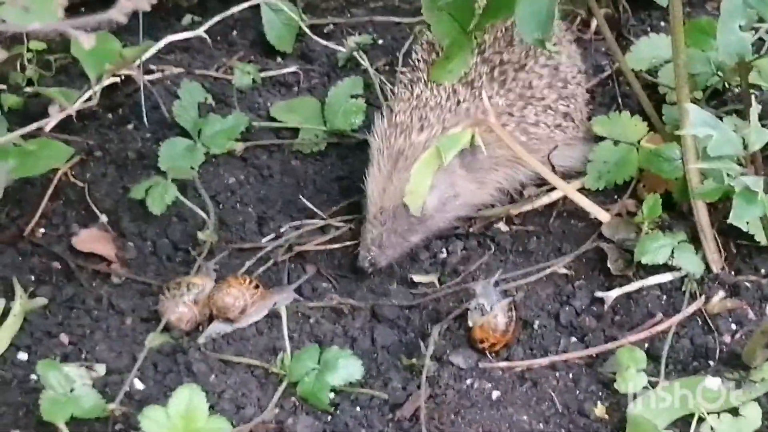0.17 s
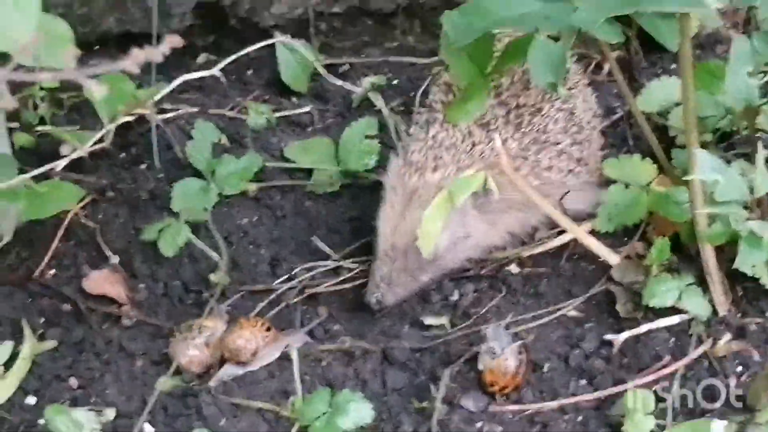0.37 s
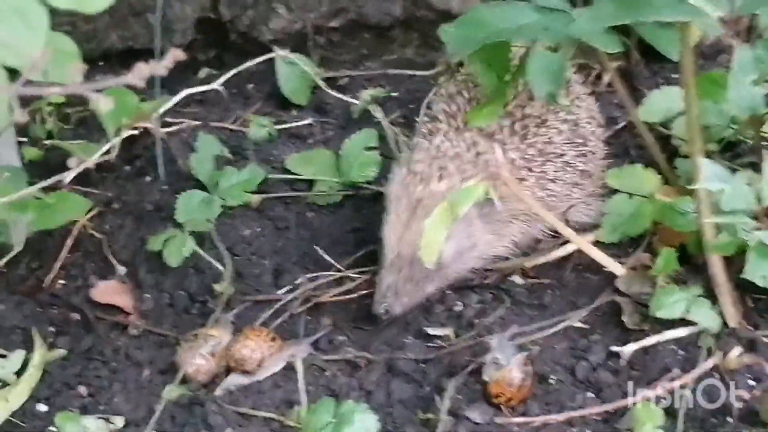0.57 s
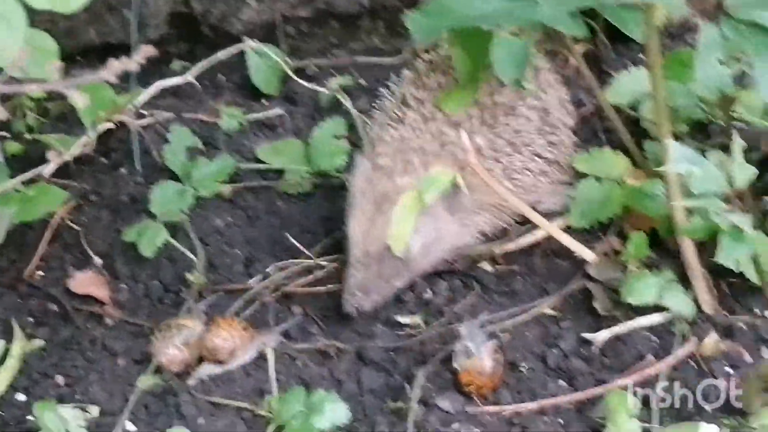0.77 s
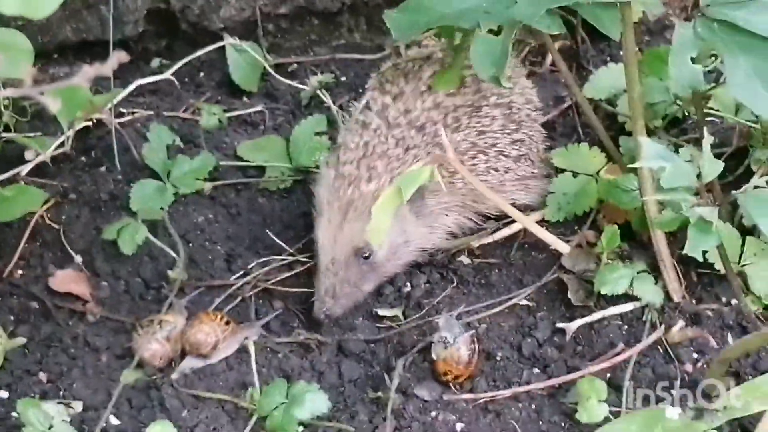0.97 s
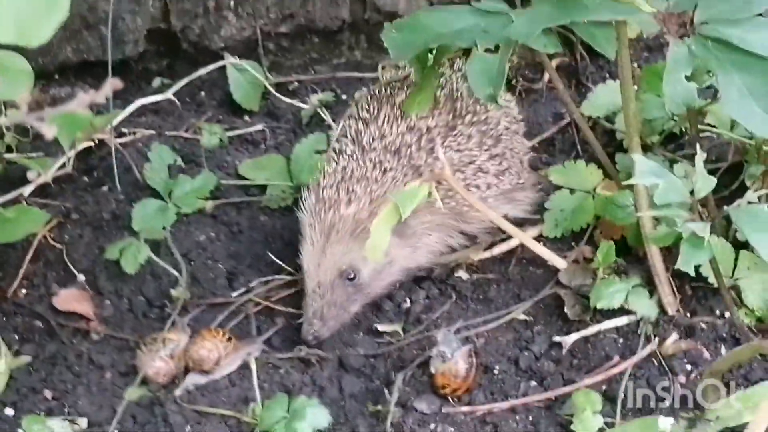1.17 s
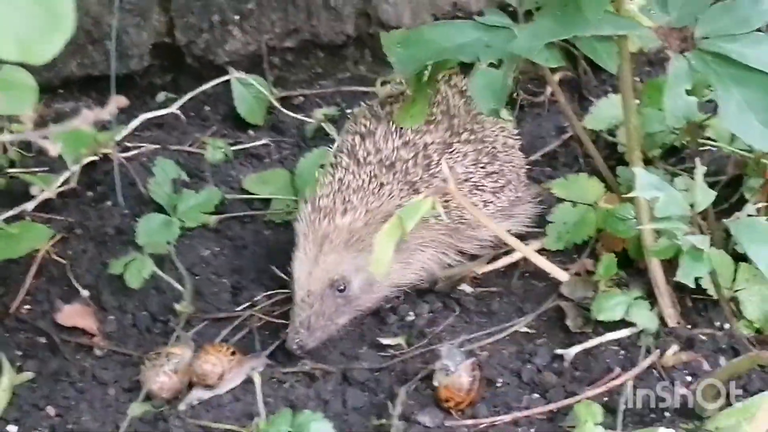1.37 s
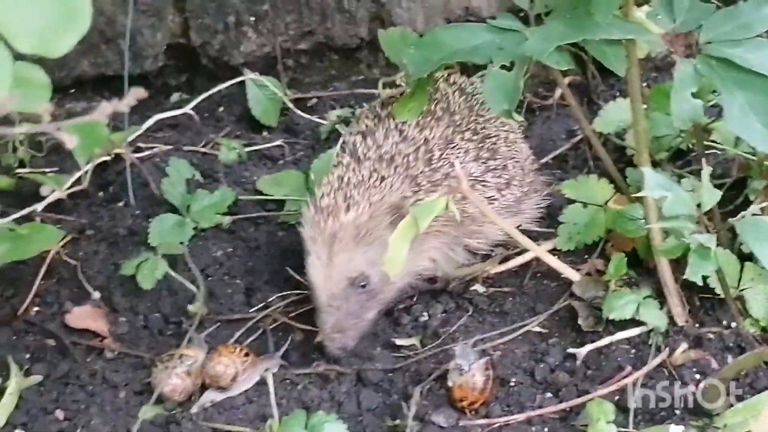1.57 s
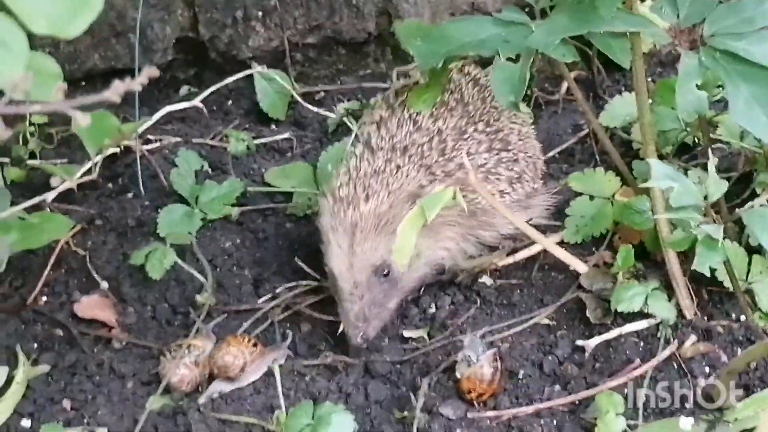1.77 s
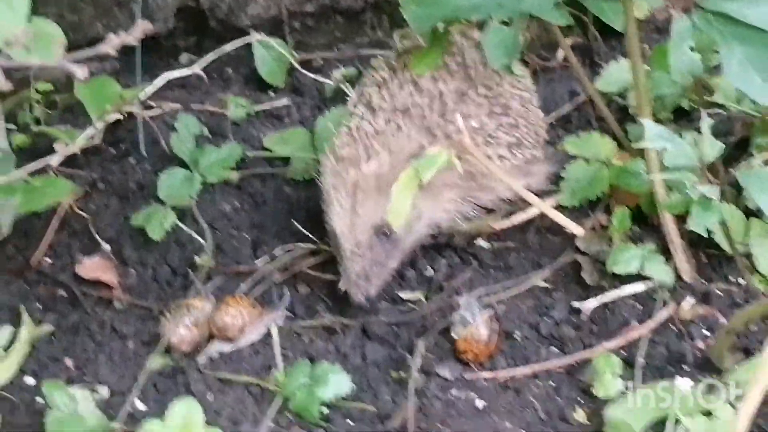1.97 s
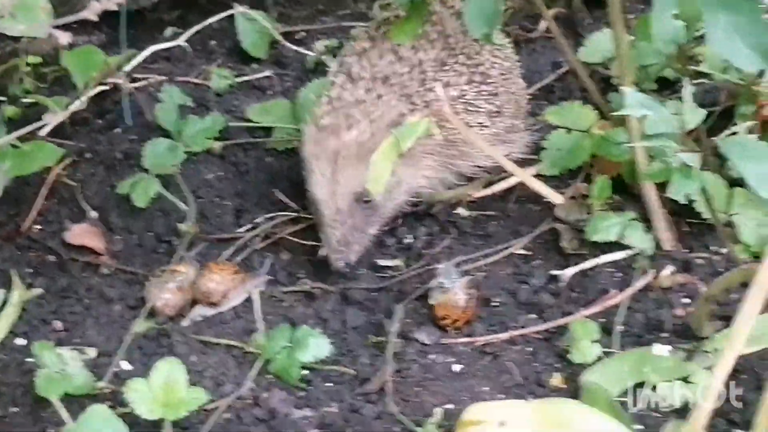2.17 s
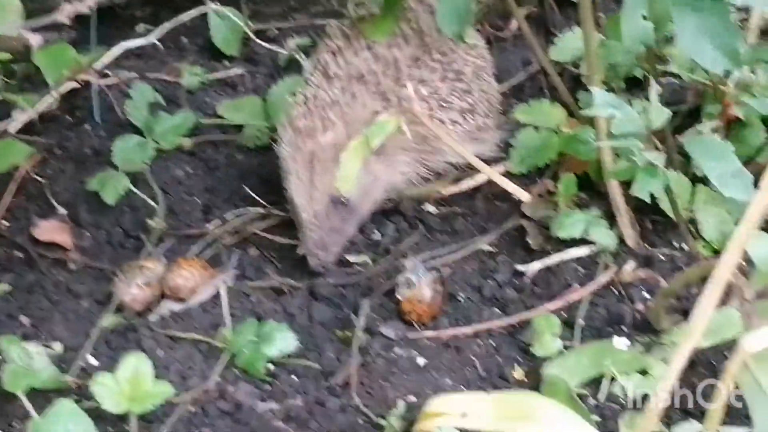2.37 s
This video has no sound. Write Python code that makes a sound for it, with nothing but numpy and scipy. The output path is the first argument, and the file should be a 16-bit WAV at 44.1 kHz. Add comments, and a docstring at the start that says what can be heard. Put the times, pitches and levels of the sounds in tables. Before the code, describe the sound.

Wind buffets the right microphone in rough thumping puffs, with faint garden ticks and leaf rustle.

```python
"""A quiet garden bed where a hedgehog noses through the soil, with garden air throughout as shaped noise.
For the first second and a half, puffs buffet the right microphone port as pressure spikes, with
fluttering bursts of turbulence over low rumble; slower, softer gusts then carry on to the end.
Small ticks and dull taps, short resonant rings, fall on both sides all along.
The sheltered left port has no wind; leaves rustle there as high noise, most clearly after two seconds."""
import sys
import numpy as np
from scipy import signal
from scipy.fft import rfft, irfft
from scipy.io import wavfile
from scipy.ndimage import uniform_filter1d

SR = 44100
rng = np.random.default_rng(int(sys.argv[2]) if len(sys.argv) > 2 else 0)


def digitize_waveform(pressure):
    """Quantize a signal to 16-bit integers and store it at the path in sys.argv[1].

    Rows of a 2-D input are taken as channels; values are limited to [-1, 1].
    """
    field = np.atleast_2d(pressure).T
    bounded = np.clip(field, -1, 1)
    quanta = np.round(bounded * 32767).astype(np.int16)
    wavfile.write(sys.argv[1], SR, quanta)


N = 107295
TIME = np.arange(N) / SR  # s

# Pressure spikes of air at the right port. Each row: centre in seconds, peak level in dB,
# half width in ms before the port's low cut.
PUFFS = [(0.1853, -8.5, 0.99), (0.212, -16, 2.6), (0.2544, -26, 0.97), (0.2785, -5, 1.61),
         (0.3354, -12, 1.3), (0.3442, -13, 1.1), (0.3541, -12.5, 0.79), (0.3623, -17.5, 0.96),
         (0.4117, -2.5, 1.33), (0.429, -15, 1.4), (0.4596, -2.5, 1.35), (0.499, -15.5, 0.48),
         (0.5075, -9, 1.4), (0.6927, -17, 1.13), (0.8421, -21.5, 1.4), (0.8554, -7, 2.55),
         (.8790, -14, 3.2), (.9090, -5, 2.02), (0.9345, -23, 1.5), (0.9694, -4, 1.19),
         (1.0105, -13.5, 1.23), (1.0248, -16.5, 1.8), (1.0430, -12, 1.75), (1.0596, -7, 3.4),
         (1.0817, -5.5, 2.98), (1.1839, -6, 1.03), (1.1937, -18.5, 1.36), (1.2309, -26.5, 2.2),
         (1.2647, -16, 1.09), (1.3063, -15, 0.93), (1.529, -19.5, 0.63), (1.5381, -24.5, 1.37)]
# Slower, soft gusts at the right port. Each row: centre in seconds, peak level in dB,
# half width in ms before the port's low cut.
GUSTS = [(.518, -19, 5), (0.58, -26.5, 3), (0.652, -30, 4), (1.486, -42, 5), (1.603, -38.5, 7),
         (1.773, -39, 6), (1.83, -45.5, 6), (1.896, -35, 6.2), (1.969, -40, 9.9), (2.02, -42, 7.7),
         (2.155, -58, 8), (2.28, -41, 7), (2.424, -42.5, 11)]
SPIKE_TAPER = 1.06  # exponent of the spike's skirts
PORT_LOW_CUT_HZ, PORT_DAMPING = 40.4, 0.78
GRIT_DB, GRIT_SPREAD_S, GRIT_HZ = -54, 0.012, 1500  # faint hiss; dB relative to mean squared pressure

# Turbulent bursts at the right port; the last row, at 1.412 s, is a noisy tail after the tap at 1.41 s. # Each
# row: crest in seconds, rise in seconds, fall in seconds, level at the start in dB, # level at the crest in dB,
# both levels before the edges are rounded.
FLUTTERS = [(0.359, 0.067, 0.024, -45, -25), (0.41, .003, 0.065, -46, -32), (.459, .004, 0.067, -37, -27.5),
            (0.497, 0.023, 0.025, -37.5, -19.5), (0.504, 0.0032, 0.012, -29.5, -17),
            (0.561, 0.012, 0.09, -59, -44), (0.697, 0.037, 0.1, -54.5, -49.5),
            (0.858, .016, 0.12, -50.5, -43.5), (0.912, .006, 0.068, -50, -46.5),
            (0.969, 0.0048, 0.023, -32, -44.5), (1.062, .054, 0.06, -43.5, -39.5),
            (1.081, 0.0048, 0.013, -44, -32.5), (1.184, 0.012, 0.026, -50.5, -41),
            (1.412, 0.0082, 0.074, -59, -47)]
# Spectrum of the turbulence. Each row: frequency in Hz, relative density in dB per Hz.
FLUTTER_SPECTRUM = [(60, -9), (150, 8), (350, 5), (700, -7), (1300, -20.5), (2600, -34), (5000, -56.5),
                    (9000, -77)]
FLUTTER_FALL_DB, FLUTTER_EDGE_S = 31, 0.003  # drop over the fall time, averaging span
FLUTTER_LUMPY_DB, FLUTTER_LUMPS_HZ = 2.5, 156  # rms depth, top rate of the level's wander
FLUTTER_HISS_DB, FLUTTER_HISS_GROWTH = -41, 1.31  # level at the highest crest, power of the swell
# Spectrum of the fastest flow's hiss. Each row: frequency in Hz, relative density in dB per Hz.
FLUTTER_HISS_SPECTRUM = [(400, -8), (900, 7.5), (2000, -2), (3500, -20), (6000, -32.5), (9000, -44.5)]

# Strength of the air flow over the right port. Each row: time in seconds, rumble level in dB.
FLOW_DB = [(0, -58.5), (.15, -59), (.2, -23.5), (.3, -24), (.5, -37.5), (.55, -28), (.62, -44.5),
           (.69, -30.5), (.74, -56.5), (.81, -62), (.87, -29), (1.09, -41), (1.14, -36), (1.25, -31.5),
           (1.35, -35.5), (1.41, -69), (1.52, -43), (1.66, -59), (1.9, -52), (2.1, -53), (2.36, -56.5),
           (2.43, -50)]
# Spectrum of the rumble. Each row: frequency in Hz, relative density in dB per Hz.
RUMBLE_SPECTRUM = [(15, -11), (35, 8.5), (70, -4.5), (140, -10.5), (280, -29.5), (600, -45), (1500, -65.5)]

# Dull taps close to the microphones. Each row: centre in seconds, left peak in dB, right peak in dB,
# half width in ms before the low cut.
TAPS = [(.049, -71, -53.5, 0.35), (.8307, -53, -59, .25), (1.4103, -45, -31.5, 0.65),
        (1.4133, -55, -40, 0.53), (1.5266, -37.5, -65, 0.16), (1.6615, -81, -48, 0.18),
        (2.3763, -61.5, -43.5, 0.1), (2.3856, -48, -49.5, 0.081), (2.3911, -54, -42.5, 0.21)]
TAP_LOW_CUT_HZ, TAP_DAMPING = 410, 0.58

# Small dry ticks from twigs and crumbs of soil; those at 0.1852 s and 1.1836 s are sharp cracks # on the edges
# of puffs at the right port. Each row: start in seconds, left snap peak in dB, # right snap peak in dB, centre
# frequency in Hz, top frequency in Hz.
TICKS = [(.139, -69, -60.5, 2540, 6130), (.1852, -70, -39.5, 1670, 2130), (.3912, -50.5, -67, 4150, 6500),
         (0.8303, -45.5, -72.5, 2200, 3870), (1.1836, -82, -53, 1710, 2400), (1.4096, -69, -50, 1700, 2300),
         (1.5266, -69, -68, 2070, 5000), (1.6616, -78, -72, 1390, 2000), (2.036, -66, -62, 3000, 6000),
         (2.3849, -29, -55, 2130, 8350)]
SNAP_DAMPING = 0.18
TWIG_HZ, TWIG_DAMPING, TWIG_DB = 730, 0.15, -3.5  # woody note; dB relative to the snap

# Level of the soft leaf rustle on the left. Each row: time in seconds, level in dB.
RUSTLE_DB = [(0, -90), (.545, -115), (.562, -72.5), (.60, -86), (.64, -77.5), (.73, -85.5), (.765, -75),
             (.80, -80.5), (.88, -81), (.95, -86), (.99, -80.5), (1.3, -96), (1.75, -91.5), (1.92, -80),
             (2.05, -70.5), (2.12, -71.5), (2.27, -84), (2.43, -89)]
# Spectrum of the rustle. Each row: frequency in Hz, relative density in dB per Hz.
RUSTLE_SPECTRUM = [(1500, -24.5), (4000, -8), (6000, -5), (7500, 0), (9200, 0.5), (10500, -9), (15000, -27)]

# Spectrum of the garden air on the left. Each row: frequency in Hz, relative density in dB per Hz.
AIR_LEFT_SPECTRUM = [(25, 8.5), (100, -1), (250, -9), (600, -17.5), (1500, -23), (4000, -32.5),
                     (6500, -36.5), (9000, -40), (11000, -50), (15000, -41.5)]
# Spectrum of the garden air on the right. Each row: frequency in Hz, relative density in dB per Hz.
AIR_RIGHT_SPECTRUM = [(25, -4), (100, 9.5), (250, -1.5), (600, -8), (1500, -13.5), (4000, -21), (6500, -26),
                      (9000, -35.5), (11000, -34.5), (15000, -39.5)]
# Level of the garden air on the left. Each row: time in seconds, level in dB.
AIR_LEFT_DB = [(0, -61), (.38, -62), (.43, -68), (.55, -59), (.63, -59.5), (.85, -58), (.93, -65),
               (1.3, -62.5), (1.52, -58), (1.75, -62), (1.95, -60.5), (2.36, -60), (2.40, -55),
               (2.43, -50.5)]
AIR_RIGHT_DB = -65

STOP_EDGE_HZ, STOP_DB = 16200, 70  # everything above the edge is at least this far down


def puffs():
    """Pressure pulses: each eddy or gust gives one spike, and the leaky port makes it swing back."""
    pressure = np.zeros(N)
    for centre_s, peak_db, width_ms in PUFFS + GUSTS:
        spike = resonant(bump(centre_s, width_ms), PORT_LOW_CUT_HZ, PORT_DAMPING, "high")
        pressure += from_db(peak_db) * peak_one(spike)
    force = uniform_filter1d(pressure ** 2, int(GRIT_SPREAD_S * SR))
    grit = resonant(rng.standard_normal(N), GRIT_HZ, 1.2, "band")
    return pressure + from_db(GRIT_DB) * force * grit / grit.std()


def flutters():
    """Turbulent flow: lumpy noise swells to a crest, gaining hiss faster than body, then collapses."""
    swell = np.zeros(N)
    for crest_s, rise_s, fall_s, start_db, crest_db in FLUTTERS:
        levels = [start_db, crest_db, crest_db - FLUTTER_FALL_DB]
        # silent (-200 dB) outside the burst
        swell += from_db(np.interp(TIME - crest_s, [-rise_s, 0, fall_s], levels, -200, -200))
    # abs removes tiny negative rounding errors ahead of the power law
    swell = np.abs(uniform_filter1d(swell, int(FLUTTER_EDGE_S * SR)))
    lumps = from_db(FLUTTER_LUMPY_DB * noise([(FLUTTER_LUMPS_HZ / 2, 0), (FLUTTER_LUMPS_HZ, 0)]))
    lumps /= np.sqrt(np.mean(lumps ** 2))
    hiss_gain = from_db(FLUTTER_HISS_DB) * peak_one(swell) ** FLUTTER_HISS_GROWTH
    body = swell * noise(FLUTTER_SPECTRUM)
    hiss = hiss_gain * noise(FLUTTER_HISS_SPECTRUM)
    return (body + hiss) * lumps


def rumble():
    """Flow noise: low-frequency noise whose level follows the strength of the air flow."""
    return level(FLOW_DB) * noise(RUMBLE_SPECTRUM)


def taps():
    """Impulsive contact: a soft pulse through a damped high-pass leaves a short, hollow ring."""
    out = np.zeros((2, N))
    for centre_s, left_db, right_db, width_ms in TAPS:
        tap = resonant(bump(centre_s, width_ms), TAP_LOW_CUT_HZ, TAP_DAMPING, "high")
        out += from_db([[left_db], [right_db]]) * peak_one(tap)
    return out


def ticks():
    """Impulse response of resonators: a click excites a dry snap and a few cycles of a woody note."""
    out = np.zeros((2, N))
    for start_s, left_db, right_db, centre_hz, top_hz in TICKS:
        impulse = np.zeros(N)
        impulse[int(start_s * SR)] = 1
        click = signal.sosfilt(signal.butter(5, top_hz, fs=SR, output="sos"), impulse)
        snap = peak_one(resonant(click, centre_hz, SNAP_DAMPING, "band"))
        note = peak_one(resonant(click, TWIG_HZ, TWIG_DAMPING, "band"))
        out += from_db([[left_db], [right_db]]) * (snap + from_db(TWIG_DB) * note)
    return out


def rustle():
    """Many small leaf contacts blend into high-frequency noise with a varying level."""
    return level(RUSTLE_DB) * noise(RUSTLE_SPECTRUM)


def garden_air():
    """Diffuse background: independent noise on each side, with a wandering level on the left."""
    left = level(AIR_LEFT_DB) * noise(AIR_LEFT_SPECTRUM)
    right = from_db(AIR_RIGHT_DB) * noise(AIR_RIGHT_SPECTRUM)
    return np.array([left, right])


def from_db(db):
    """Amplitude gain is ten to the power of decibels over twenty."""
    return 10 ** (np.asarray(db) / 20)


def level(rows):
    """Amplitude envelope: gain along a curve of (s, dB), straight in dB between points."""
    return from_db(np.interp(TIME, *np.transpose(rows)))


def noise(spectrum):
    """Spectral shaping: white noise weighted by (Hz, dB per Hz), falling past the last point, rms 1."""
    hz, db = np.transpose(spectrum)
    f = np.maximum(np.fft.rfftfreq(N, 1 / SR), 1)
    gain = from_db(np.interp(np.log(f), np.log(hz), db))
    gain /= np.maximum(f / hz[-1], 1) ** 2
    x = irfft(rfft(rng.standard_normal(N)) * gain, N)
    return x / x.std()


def resonant(x, hz, damping, kind):
    """Damped second-order resonance, as a "high"-pass or a "band"-pass."""
    w = 2 * np.pi * hz / SR
    a = np.sin(w) * damping
    if kind == "high":
        b = np.array([1, -2, 1]) * (1 + np.cos(w)) / 2
    else:
        b = [a, 0, -a]
    return signal.lfilter(b, [1 + a, -2 * np.cos(w), 1 - a], x)


def peak_one(x):
    """Normalization to a peak magnitude of 1."""
    return x / np.abs(x).max()


def bump(centre_s, width_ms):
    """Near-Lorentzian pressure pulse: a rounded spike with long skirts."""
    u = (TIME - centre_s) * 1000 / width_ms
    return (1 + u * u) ** -SPIKE_TAPER


def scene():
    """Superposition: wind on the right, rustle on the left, contacts and garden air on both."""
    right_wind = puffs() + flutters() + rumble()
    return np.array([rustle(), right_wind]) + taps() + ticks() + garden_air()


def record(dry):
    """Band limiting: a steep low-pass removes the top of the spectrum."""
    return signal.sosfilt(signal.cheby2(12, STOP_DB, STOP_EDGE_HZ, fs=SR, output="sos"), dry)


dry = scene()
out = record(dry)
digitize_waveform(out)
```